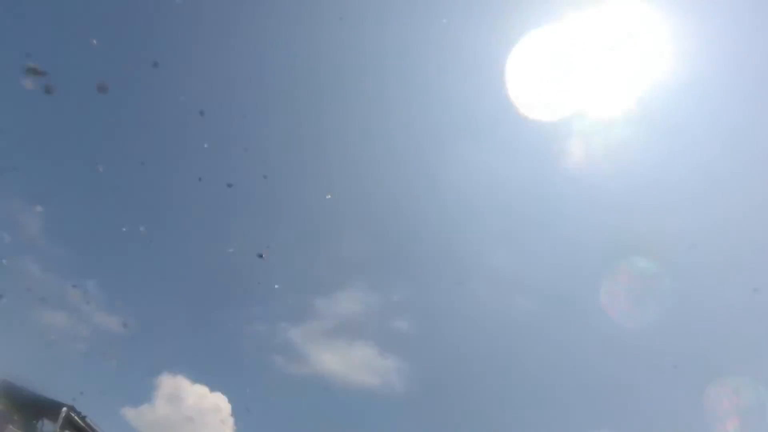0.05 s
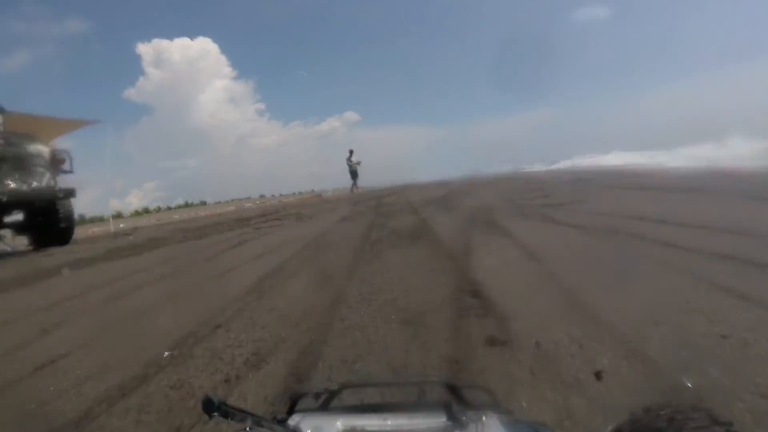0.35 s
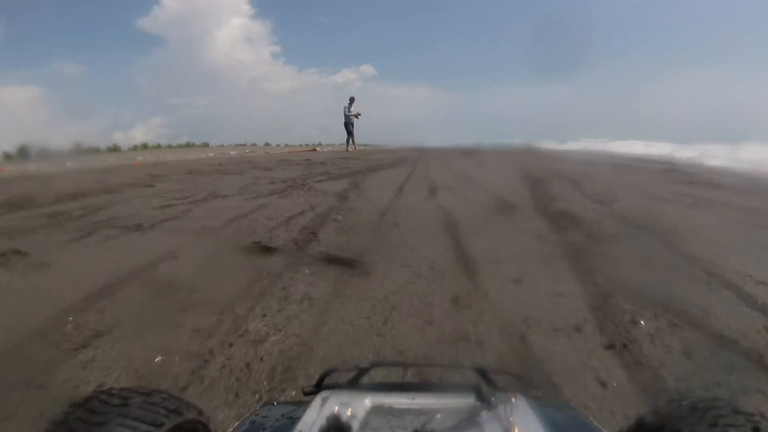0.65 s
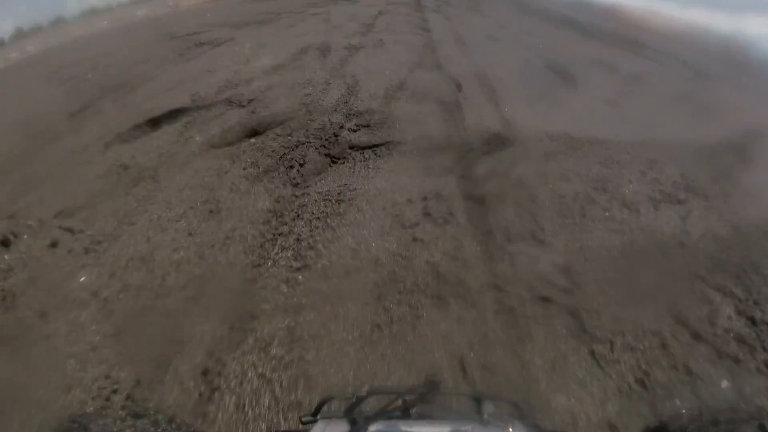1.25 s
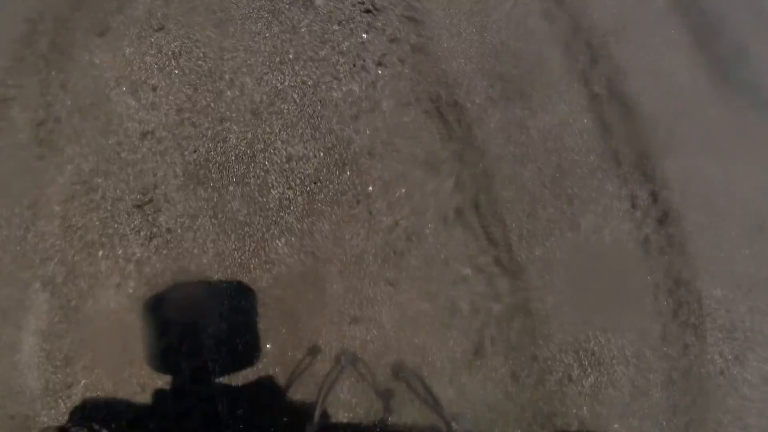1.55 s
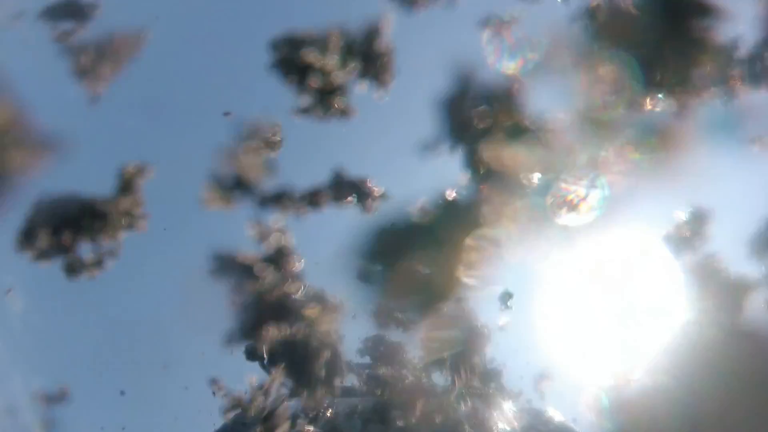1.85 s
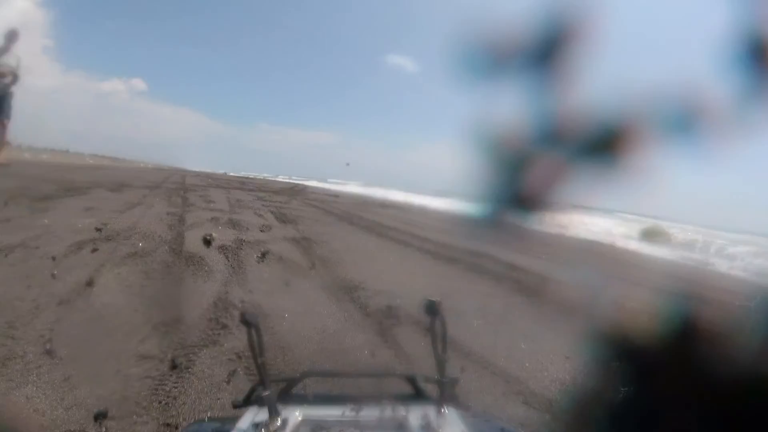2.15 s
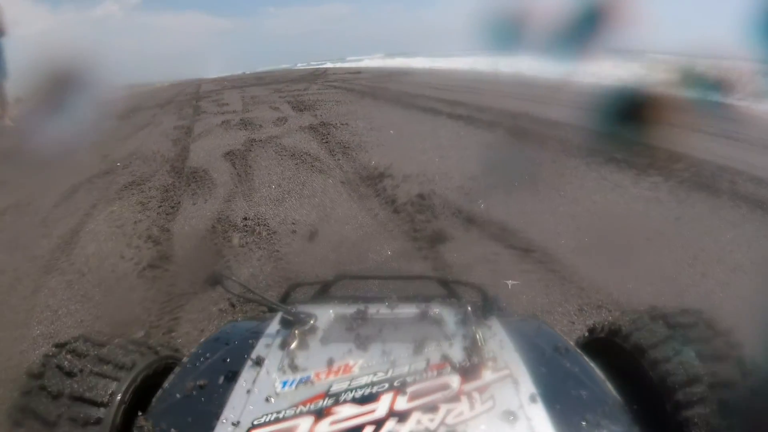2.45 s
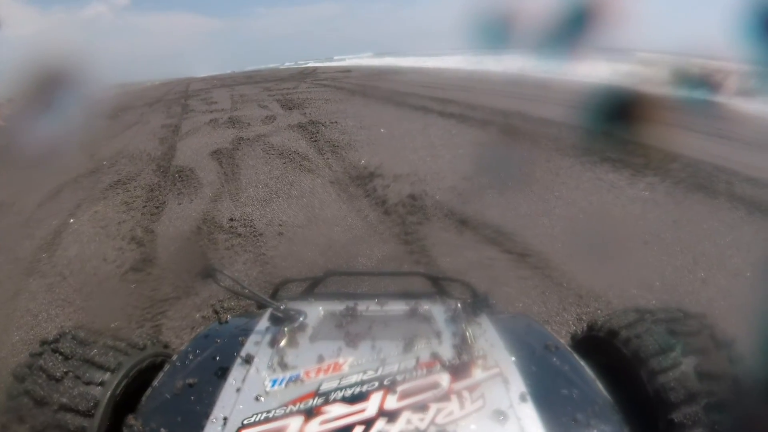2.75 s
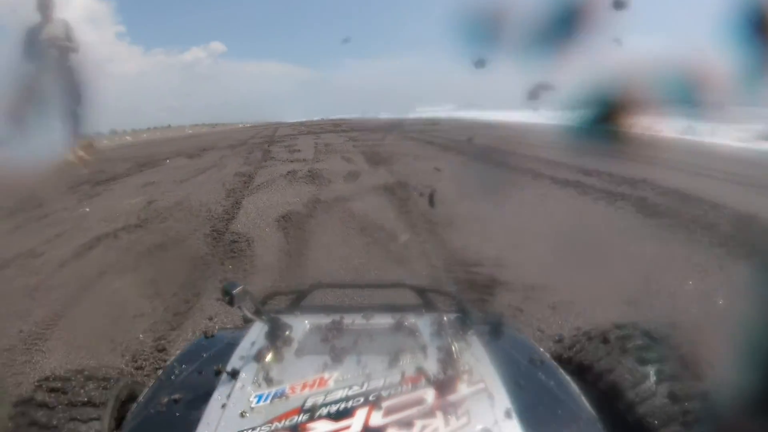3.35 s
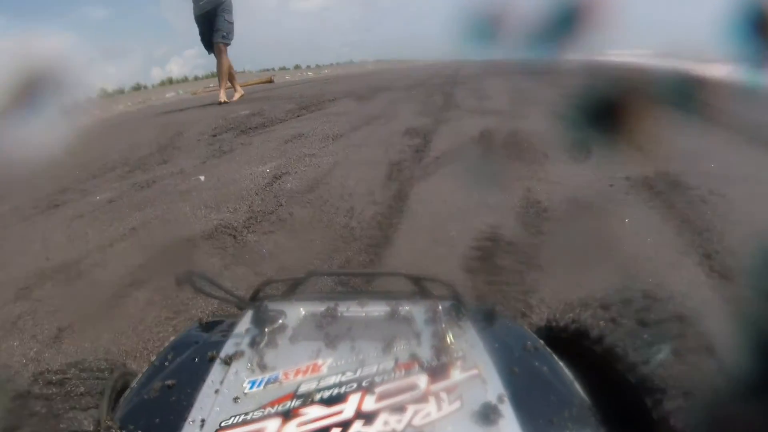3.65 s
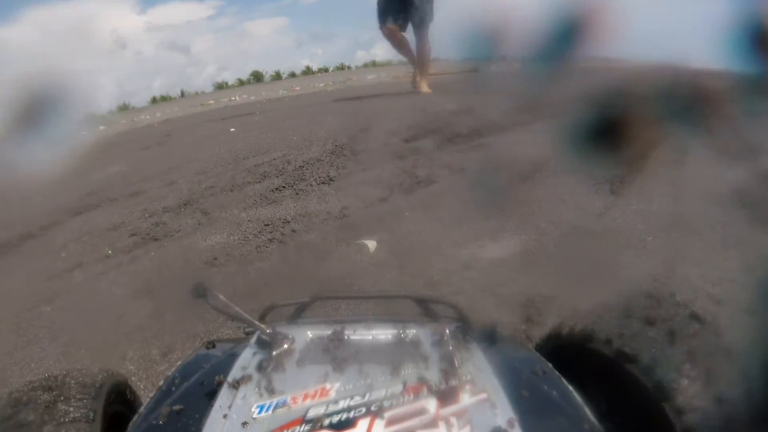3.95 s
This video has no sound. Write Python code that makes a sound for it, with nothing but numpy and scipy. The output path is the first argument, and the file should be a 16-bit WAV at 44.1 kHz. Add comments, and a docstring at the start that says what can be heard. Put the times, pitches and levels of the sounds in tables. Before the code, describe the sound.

Toy truck racing up close with whirring gears and rumble, tumbling, pausing and pulling away.

```python
"""A small electric toy truck on beach sand, the microphone riding on its deck, surf in the distance.
It races along: gears whine with the motor's speed, the plastic chassis rattles and knocks, and the
bouncing body and rushing air rumble at the microphone. Near 1.75 s it flips, sand spraying over
the shell, and at 2.3 s it lands. It rests briefly with the surf behind it, then at 3.15 s
pulls away, the gears now gritty."""
import sys
import numpy as np
from scipy import signal
from scipy.fft import rfft, irfft, next_fast_len
from scipy.io import wavfile
from scipy.ndimage import uniform_filter1d

SR = 44100
rng = np.random.default_rng(int(sys.argv[2]) if len(sys.argv) > 2 else 0)


def put_to_file(sound):
    """Save the sound as 16-bit audio at rate SR, in the file named by the first command-line argument."""
    columns = np.atleast_2d(sound).T  # one column per channel
    safe = np.clip(columns, -1, 1)
    whole_steps = np.round(safe * 32767)
    wavfile.write(sys.argv[1], SR, whole_steps.astype(np.int16))


N = 176400
T = np.arange(N) / SR

# Spectrum of the distant waves: frequency_hz, gain_db
SURF_SPECTRUM = [(60, -21.5), (125, 2), (170, -4), (240, 0.5), (400, -7.5), (900, -21.5), (1440, -21.5),
                 (2620, -29.5), (7000, -42), (10000, -47.5), (14000, -63)]
# Gear mesh, following the motor's speed: time_s, pitch_hz
MESH_PITCH = [(0, 1350), (.1, 1405), (.17, 1602), (.29, 1212), (.6, 1650), (.97, 1519), (1.11, 1456),
              (1.16, 1660), (1.5, 1154), (3.18, 927), (3.28, 1333), (3.31, 1432), (3.34, 1620),
              (3.36, 1884), (3.39, 1436), (3.5, 1124), (3.72, 1172), (3.775, 1309), (3.805, 1638),
              (3.84, 1646), (4, 1015)]
# Motor effort, one list before the flip and one after the restart: time_s, level_db
MOTOR_EFFORT = [
    [(0.03, -43), (0.266, -55), (0.318, -45), (0.326, -54.5), (0.942, -51), (0.968, -47), (0.984, -53),
     (1.144, -43), (1.226, -57), (1.43, -67)],
    [(3.21, -62.5), (3.346, -47.5), (3.414, -55), (3.454, -67), (3.566, -74), (3.57, -64), (3.684, -69),
     (3.692, -57.5), (3.832, -52.5), (3.86, -58)],
]
# Spectrum of the fizzing gear teeth: frequency_hz, gain_db
FIZZ_SPECTRUM = [(900, -8), (1800, 5.5), (3050, 5.5), (3700, 0.5), (4700, 2.5), (5400, 1), (6200, -6.5),
                 (8000, -12), (10000, -24.5), (15000, -50)]
# The gears sing out under load: start_s, length_s, tone_db, third_harmonic_db
GEAR_SURGES = [(0.058, 0.057, -49, -55), (0.157, 0.057, -37, -73), (0.961, 0.014, -43, -41),
               (1.025, 0.12, -61, -56), (1.131, 0.03, -27.5, -51), (3.224, 0.05, -31, -66),
               (3.305, 0.092, -47, -53), (3.723, 0.045, -32, -75), (3.788, 0.057, -40, -66)]
# The drivetrain moans as it slows: start_s, length_s, start_hz, end_hz, level_db
GEAR_MOANS = [(0.0069, .12, 890, 1000, -27.5), (.18, .07, 678, 750, -29), (.98, 0.095, 460.4, 425, -27),
              (1.134, 0.0326, 710, 580, -15), (1.13, .022, 2230, 2260, -32)]
# Chassis shaking, one list each for the run, the tumble and pulling away: time_s, level_db
CHASSIS_SHAKE = [
    [(0.01, -22.5), (0.242, -31.5), (0.472, -31), (0.756, -31), (1.162, -26), (1.29, -31), (1.68, -32),
     (1.72, -29.5)],
    [(1.83, -27.5), (1.986, -40.5), (2.058, -47.5), (2.382, -42), (2.514, -50), (2.62, -56)],
    [(3.14, -47.5), (3.17, -32.5), (3.32, -31.5), (3.59, -36), (3.98, -32)],
]
# Resonances of the plastic chassis: pitch_hz, gain_db, t60_s
CHASSIS_MODES = [(317, -9.5, 0.1), (491.5, -4.5, 0.072), (618.5, -0.5, 0.049), (832, 1, 0.08),
                 (1108, -1.5, 0.021), (1240, -12, 0.0065), (1620, -11, .025), (2074, -19.5, 0.022)]
# Spectra of rattling parts and of sharp cracks on the shell: frequency_hz, gain_db
RATTLE_SPECTRUM = [(120, 13), (260, -10.5), (450, 3), (650, -1.5), (1000, 4), (1400, -11), (2200, -29.5),
                   (3500, -32.5), (7000, -44), (12000, -82.5)]
CRACK_SPECTRUM = [(500, -7.5), (2000, 10), (4500, 3), (8000, -6), (10000, -25), (15000, -42.5)]
# Buffeting at the microphone, and tyres drumming over the sand: time_s, level_db
BUFFET_LEVEL = [(0.0, -11), (0.41, -13.5), (0.43, -18), (0.81, -12.5), (1.46, -8.5), (1.55, -16),
                (1.78, -7), (1.88, -18.5), (1.92, -10), (1.99, -26.5), (2.07, -18.5), (2.24, -34),
                (2.29, -8), (2.34, -17), (2.46, -18), (2.75, -44), (3.15, -39.5), (3.163, -9), (3.24, -10),
                (3.26, -23.5), (3.35, -15), (3.56, -15), (3.63, -23.5), (3.66, -15), (3.7, -29),
                (3.73, -11), (3.81, -16), (3.9, -11), (3.97, -9)]
DRUM_LEVEL = [(0.0, 8), (0.01, -15), (0.15, -12), (0.23, -45), (0.27, -15), (0.54, -27.5), (0.86, -14.5),
              (1.05, -26.5), (1.19, -14), (1.41, -20.5), (1.45, -12.5), (1.56, -31), (1.82, -12),
              (1.84, -22.5), (2.22, -43), (2.29, -10), (2.35, -35.5), (2.62, -48), (3.15, -40),
              (3.19, -12.5), (3.27, -31), (3.36, -14), (3.48, -29.5), (3.98, -19.5)]
# Spectra of that buffeting and drumming: frequency_hz, gain_db
BUFFET_SPECTRUM = [(15, -12.5), (27, -1), (33, -6), (42, 5), (53, -3), (68, -3.5), (95, -19), (130, -20.5),
                   (180, -32.5), (260, -54), (500, -52.5), (1200, -113)]
DRUM_SPECTRUM = [(50, -28.5), (100, -7.5), (132, 8.5), (165, -6), (200, -8), (250, -17.5), (350, -19.5),
                 (500, -22.5), (1200, -77)]
# Sand showers the shell, and crunches where the wheels dig in: start_s, length_s, level_db
SAND_SPRAYS = [(0, 0.15, -41), (1.75, 0.044, -26), (1.762, 0.017, -31), (1.799, 0.024, -34.5),
               (1.898, 0.0051, -33.5), (1.904, 0.035, -51.5)]
SAND_CRUNCHES = [(0.107, .055, -33), (1.155, 0.073, -27), (1.44, 0.075, -27.5), (2.257, 0.035, -43),
                 (2.286, 0.014, -24.5), (2.317, 0.029, -36), (2.353, 0.038, -32), (3.339, 0.074, -31.5),
                 (3.796, 0.057, -32)]
# Spectra of that spray and crunch: frequency_hz, gain_db
SPRAY_SPECTRUM = [(400, 14.5), (1400, 18), (2800, 0), (5000, 1), (7000, 0), (9500, -12.5), (15000, -26)]
CRUNCH_SPECTRUM = [(200, -3), (500, 6.5), (1100, 8.5), (2000, -12), (3200, -24.5), (7000, -36),
                   (12000, -65)]
# The suspension bottoms out: start_s, length_s, level_db
SUSPENSION_BUMPS = [(.01, 0.029, -20.5), (0.129, 0.041, -23), (0.254, 0.075, -24), (1.197, 0.085, -25),
                    (1.455, 0.081, -21.5), (1.624, 0.034, -21.5), (1.681, 0.1, -23.5), (1.806, 0.023, -22),
                    (2.309, 0.034, -29.5), (3.765, 0.0065, -25.5)]
# Spectrum of its dull judder: frequency_hz, gain_db
BUMP_SPECTRUM = [(90, -28), (200, 13), (300, -3.5), (480, 2.5), (620, 2), (900, -15), (2000, -23.5),
                 (5000, -72)]
# Knocks on the chassis: start_s, level_db, relative_treble_db, relative_thump_db, ring_hz
CHASSIS_KNOCKS = [(.259, -20, -26, 15, 860), (0.299, -18, -18, 18.5, 680), (0.317, -19.5, -11, -17, 398),
                  (0.332, -14, -28, -23, 815), (.344, -19.5, -15, -5, 1100), (0.378, -15, -22, -3, 944),
                  (0.419, -17, -19, -13, 940), (1.246, -25, -21, -4, 420), (1.264, -16, -37, -16, 1155),
                  (1.316, -17.5, -20, 11, 830), (1.369, -22, -18.5, -24, 597),
                  (1.446, -15, -16.5, 9.5, 394), (1.488, -21, -15, -8, 1120), (1.494, -10, -35, 2, 593),
                  (1.517, -18, -37, -2, 611), (1.637, -23, -50, 16.5, 640), (1.675, -18.5, -14, 8, 400),
                  (1.723, -14, -26, -12, 550), (1.803, -7.5, -32, 13, 513), (1.818, -24.5, -8, 3, 780),
                  (1.899, -18.5, -32, 13, 907), (1.943, -32.5, -23, -10, 665), (2.033, -35, -14, -10, 700),
                  (2.303, -19.5, -43, 7, 595), (2.418, -19.5, -32, 11.5, 475), (2.552, -38, -30, 12, 444),
                  (3.151, -28, -5, -9, 653), (3.177, -24, -11.5, -12, 563), (3.598, -23, -32, -14, 780),
                  (3.693, -26.5, -28, -7, 838), (3.876, -22, -12.5, 9, 578)]
# The body slams on the ground: start_s, level_db, relative_crack_db
GROUND_SLAMS = [(1.74, -6.5, -28), (1.7907, -4, -26), (2.2936, -2, -14.5)]
# Resonances of the whole truck, damped by the ground: pitch_hz, gain_db, t60_s
TRUCK_MODES = [(188, -5.5, 0.024), (396, 6.5, 0.012), (700, 5, 0.0094), (1094, -10.5, 0.017)]
# Resonances of the gearbox housing: pitch_hz, gain_db, t60_s
HOUSING_MODES = [(2180, -6, 0.0065), (2560, 5, 0.024), (3040, -2.5, 0.017), (4200, -6, 0.0092),
                 (5200, -9, 0.011)]

# Trims on top of the tables' levels
FIZZ_DB, WHINE_DB, WHINE_THIRD_DB = 3.5, -3, -5.5
RATTLE_DB, CHASSIS_DB, GRIT_DB = 2.5, -5.5, -31
BUFFET_DB, DRUM_DB = -0.5, -3
CONTACT_DB, PANEL_DB, THUMP_DB, SLAM_DB = -3.5, -1.5, -2, -0.5


def from_db(db):
    """Decibels to gain."""
    return 10 ** (np.asarray(db) / 20)


def rms_one(x):
    """Scale to rms 1."""
    return x / np.sqrt(np.mean(x ** 2) + 1e-20)


def peak_one(x):
    """Scale to peak 1."""
    return x / np.abs(x).max()


def curve(rows):
    """Join (time_s, value) rows by straight lines."""
    return np.interp(T, *np.transpose(rows))


def drift(rate_hz):
    """Smooth random wander with a spread of 1."""
    hop, settle = 40, 2000
    pole = np.exp(-2 * np.pi * rate_hz * hop / SR)
    noise = rng.standard_normal(N // hop + settle + 2)
    slow = signal.lfilter([1], [1, -2 * pole, pole * pole], noise)[settle:]
    return np.interp(np.arange(N) / hop, np.arange(len(slow)), rms_one(slow))


def colour(x, spectrum):
    """Causal filter with the given (frequency_hz, gain_db) shape."""
    size = 2 * next_fast_len(len(x))
    hz, db = np.transpose(spectrum)
    bin_db = np.interp(np.log(np.fft.rfftfreq(size, 1 / SR) + 1), np.log(hz), db)
    cepstrum = irfft(np.log(from_db(bin_db)))
    cepstrum[1:size // 2] *= 2  # fold to minimum phase
    cepstrum[size // 2 + 1:] = 0
    return irfft(rfft(x, size) * np.exp(rfft(cepstrum)))[:len(x)]


def even_noise(spectrum, window_s):
    """Coloured noise held near rms 1 over a sliding window."""
    noise = colour(rng.standard_normal(N), spectrum)
    return noise / np.sqrt(uniform_filter1d(noise ** 2, int(window_s * SR)) + 1e-12)


def ring(x, hz, t60_s):
    """Resonator: a unit click starts a decaying sine of height 1."""
    radius, angle = from_db(-60 / (t60_s * SR)), 2 * np.pi * hz / SR
    return signal.lfilter([0, np.sin(angle)], [1, -2 * radius * np.cos(angle), radius ** 2], x + 1e-18)


def grains(per_s, spread_db):
    """Random clicks of uneven size."""
    hits = rng.random(N) < per_s / SR
    sizes = from_db(spread_db * np.minimum(rng.exponential(1, N), 4))
    return hits * sizes * rng.choice([-1, 1], N)


def swell(start_s, length_s, edge_s):
    """Rise, hold, fall."""
    return np.clip(np.minimum(T - start_s, start_s + length_s - T) / edge_s + .5, 0, 1)


def add(out, start_s, sound):
    """Mix a sound in at a time."""
    i = max(int(start_s * SR), 0)
    out[i:i + len(sound)] += sound[:N - i]


def turns(hz, wobble, rate_hz):
    """Phase of a shaft that runs unevenly."""
    return 2 * np.pi * np.cumsum(hz * (1 + wobble * drift(rate_hz))) / SR


def surf(level_db=-47.5):
    """Steady wash of distant waves."""
    wash = colour(rng.standard_normal(N), [(40, -20), *SURF_SPECTRUM])
    return from_db(level_db) * rms_one(wash)


def gears():
    """Teeth mesh roughly, whining and fizzing with effort; they die away from flip to restart."""
    racing, leaving = MOTOR_EFFORT
    effort = from_db(curve([*racing, (1.72, -66), (1.95, -85), (3.1, -85), *leaving, (3.95, -62)]))
    mesh = turns(curve(MESH_PITCH), wobble=.036, rate_hz=280)
    teeth = rng.standard_normal(N) * (1 + .7 * np.cos(mesh)) * from_db(3 * drift(160))
    fizz = rms_one(colour(teeth, FIZZ_SPECTRUM))
    tone = np.sin(mesh + .5 * drift(300))
    third = np.sin(3 * mesh + drift(400))
    chatter = rms_one(from_db(4.5 * drift(130)))
    whine = effort * (from_db(WHINE_DB) * tone + from_db(WHINE_THIRD_DB) * third)
    for start_s, length_s, tone_db, third_db in GEAR_SURGES:
        surge = from_db(tone_db) * tone + from_db(third_db) * third
        whine += swell(start_s, length_s, edge_s=.023) * surge
    return effort * from_db(FIZZ_DB) * fizz + whine * chatter


def moans():
    """The slowing drivetrain moans in short, juddering glides."""
    out = np.zeros(N)
    for start_s, length_s, start_hz, end_hz, db in GEAR_MOANS:
        glide_hz = curve([(start_s, start_hz), (start_s + length_s, end_hz)])
        tone = np.sin(turns(glide_hz, wobble=.04, rate_hz=260))
        judder = rms_one(from_db(3.5 * drift(110)))
        out += from_db(db) * judder * swell(start_s, length_s, edge_s=.012) * tone
    return out


def chassis_rattle():
    """Tread and loose parts patter into the chassis under the microphone; grit ticks on the shell."""
    shake = from_db(curve([row for stretch in CHASSIS_SHAKE for row in stretch]))
    patter = rms_one(grains(per_s=600, spread_db=3.5)) + .91 * rng.standard_normal(N)
    modes = rms_one(sum(from_db(db) * ring(patter * (1 + drift(110)), hz, t60_s) * (-1) ** k
                        for k, (hz, db, t60_s) in enumerate(CHASSIS_MODES)))
    rattle = rms_one(colour(patter, RATTLE_SPECTRUM))
    grit = rms_one(colour(grains(per_s=320, spread_db=3), CRACK_SPECTRUM))
    return shake * (from_db(RATTLE_DB) * rattle + from_db(CHASSIS_DB) * modes + from_db(GRIT_DB) * grit)


def buffeting():
    """The bouncing body and rushing air make a lumpy rumble right at the microphone."""
    return even_noise(BUFFET_SPECTRUM, window_s=.05) * from_db(BUFFET_DB + curve(BUFFET_LEVEL))


def tyres():
    """Just below the deck, the tyres drum hollowly over the sand."""
    return even_noise(DRUM_SPECTRUM, window_s=.06) * from_db(DRUM_DB + curve(DRUM_LEVEL))


def sand():
    """Thrown sand hits the shell as a dense shower of grains; under the wheels it crunches duller."""
    shower = rms_one(colour(grains(per_s=4500, spread_db=2.5), SPRAY_SPECTRUM))
    crunch = rms_one(colour(grains(per_s=2500, spread_db=2.5), CRUNCH_SPECTRUM))
    out = np.zeros(N)
    for sound, bursts in ((shower, SAND_SPRAYS), (crunch, SAND_CRUNCHES)):
        for start_s, length_s, db in bursts:
            out += from_db(db) * swell(start_s, length_s, edge_s=.0054) * sound
    return out


def suspension():
    """Short dull judders as the wheels hit ridges in the sand."""
    bumps = sum(from_db(db) * swell(start_s, length_s, edge_s=.0034)
                for start_s, length_s, db in SUSPENSION_BUMPS)
    return bumps * even_noise(BUMP_SPECTRUM, window_s=.0081)


def knocks():
    """Short scuffs, heard close, ring one panel and the chassis, with a crack and a low thump."""
    out, t = np.zeros(N), T[:SR // 8]
    click = 1.0 * (t == 0)
    for start_s, db, treble_db, thump_db, ring_hz in CHASSIS_KNOCKS:
        scuffs = rng.standard_normal((len(CHASSIS_MODES) + 1, len(t))) * np.exp(-t / .0032)
        body = sum(from_db(mode_db) * ring(scuff, hz, t60_s)
                   for scuff, (hz, mode_db, t60_s) in zip(scuffs, CHASSIS_MODES))
        contact = 1.2 * peak_one(body) + peak_one(colour(scuffs[0], CRUNCH_SPECTRUM))
        panel = from_db(PANEL_DB) * ring(click, ring_hz, t60_s=.041) * (1 - np.exp(-t / .00014))
        crack = from_db(treble_db) * peak_one(colour(scuffs[-1], CRACK_SPECTRUM))
        thump = from_db(THUMP_DB + thump_db) * ring(click, hz=181, t60_s=.02)
        add(out, start_s, from_db(db) * (from_db(CONTACT_DB) * contact + panel + crack + thump))
    return out


def slams():
    """The truck hits the ground: each hard pulse rings the whole body, with a sharp crack."""
    out, t = np.zeros(N), T[:SR // 8]
    click = 1.0 * (t == 0)
    attack = 1 - np.exp(-t / .00049)
    blow = attack * sum(from_db(db) * ring(click, hz, t60_s) for hz, db, t60_s in TRUCK_MODES)
    crack = peak_one(colour(click, CRACK_SPECTRUM))
    for start_s, db, crack_db in GROUND_SLAMS:
        add(out, start_s, from_db(SLAM_DB + db) * (blow + from_db(crack_db) * crack))
    return out


def housing_rasp(restart_s=3.15, pinion_teeth=9, full_effort_db=-48.5):
    """After the restart the gears run gritty: they catch once a turn and ring their housing."""
    shaft = turns(curve(MESH_PITCH) / pinion_teeth, wobble=.08, rate_hz=60)
    grit = grains(per_s=4000, spread_db=2) * (1 + np.cos(shaft)) ** 2
    housing = rms_one(sum(from_db(db) * ring(grit, hz, t60_s) for hz, db, t60_s in HOUSING_MODES))
    effort_db = curve([*MOTOR_EFFORT[1], (3.95, -62)])
    level_db = full_effort_db + .75 * (effort_db - effort_db.max())
    return housing * swell(restart_s, length_s=2, edge_s=.02) * from_db(level_db)


def scene():
    """One microphone on the deck: the truck close up, the surf far behind."""
    running = gears() + moans() + chassis_rattle() + buffeting() + tyres() + sand() + suspension()
    return (surf() + running + knocks() + slams() + housing_rasp())[None]


def record(dry):
    """The recorder rounds off the highest peaks and cuts the treble above 15.2 kHz."""
    limited = dry / (1 + dry ** 8) ** (1 / 8)
    return signal.sosfilt(signal.ellip(10, .1, 80, 15200, fs=SR, output="sos"), limited)


dry = scene()
out = record(dry)
put_to_file(out)
```